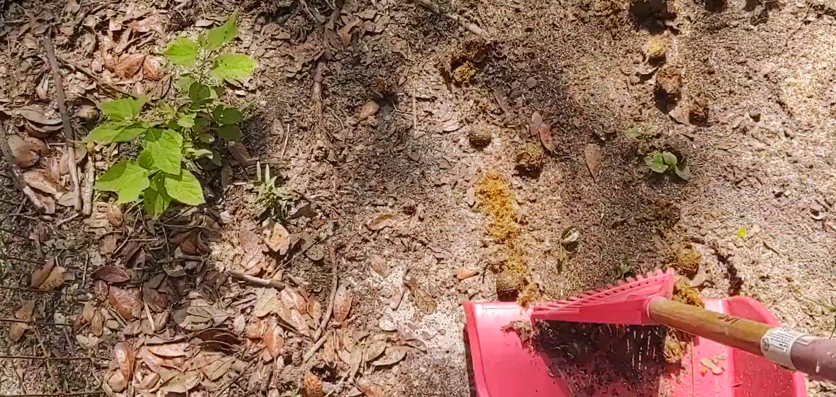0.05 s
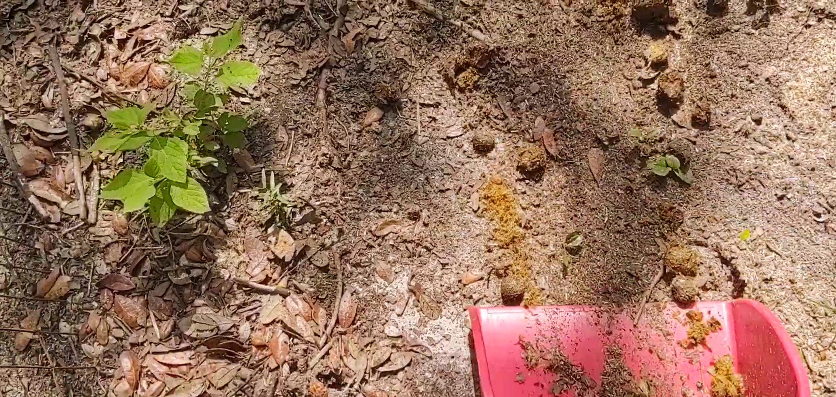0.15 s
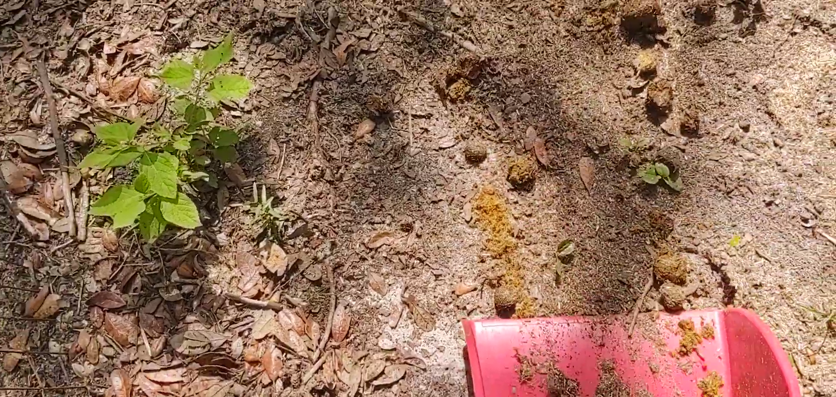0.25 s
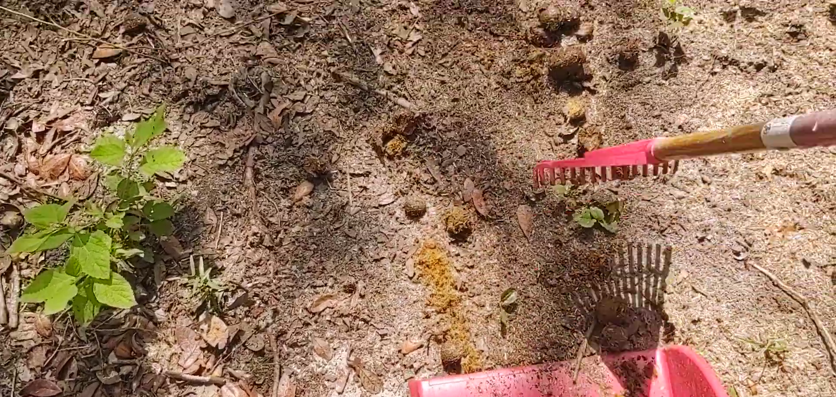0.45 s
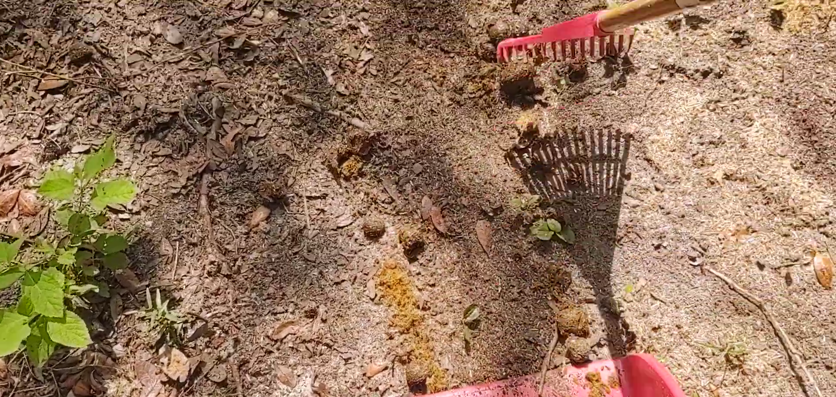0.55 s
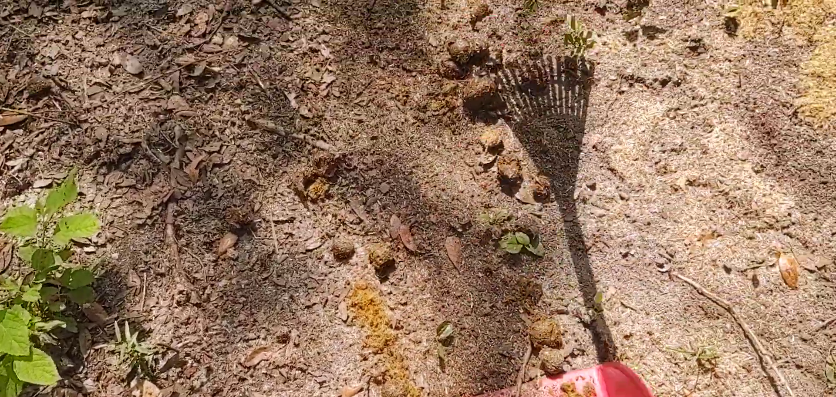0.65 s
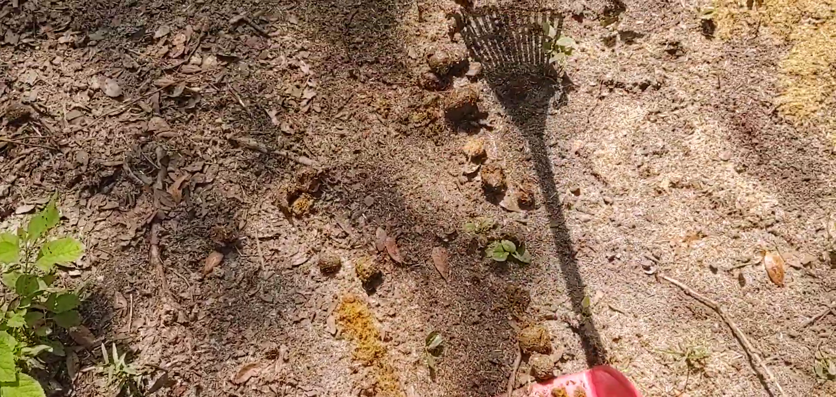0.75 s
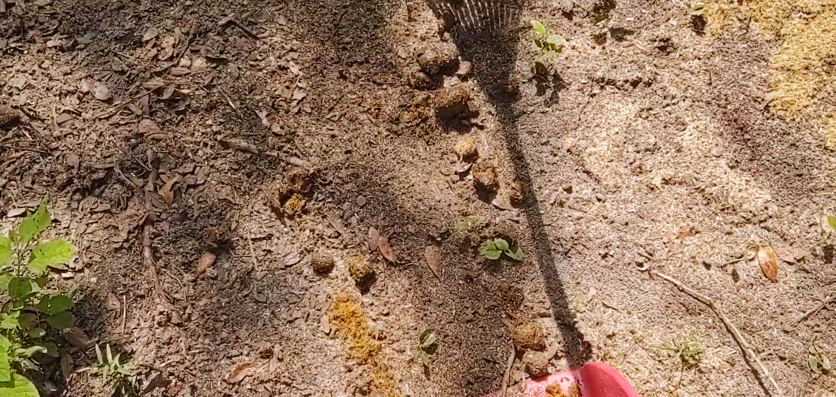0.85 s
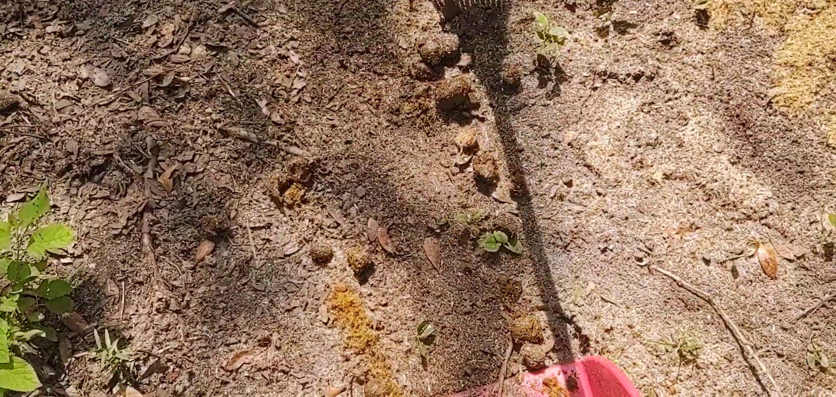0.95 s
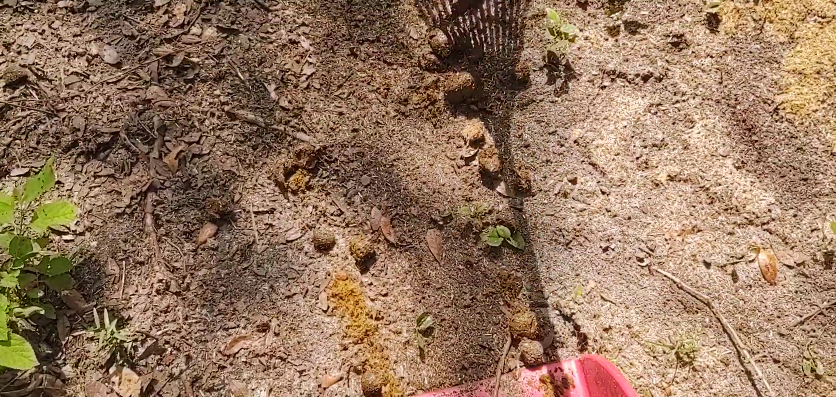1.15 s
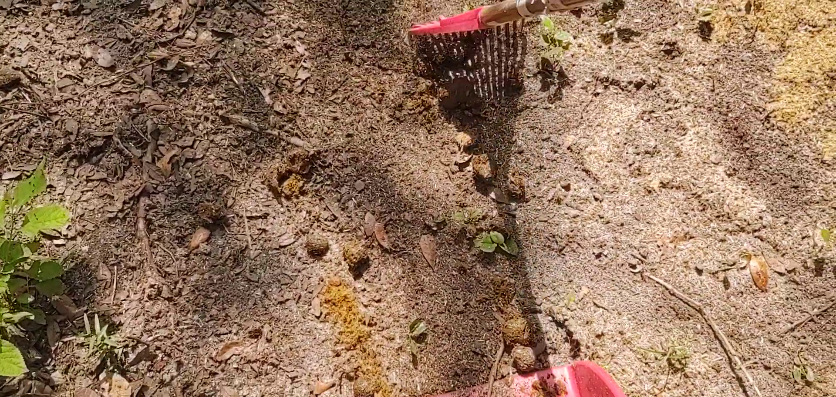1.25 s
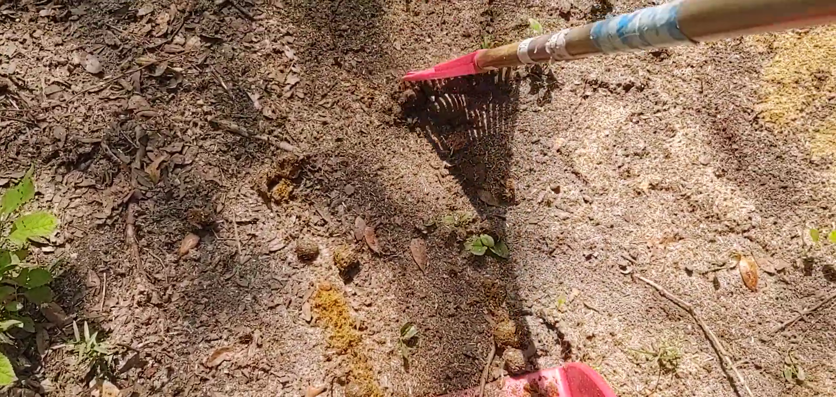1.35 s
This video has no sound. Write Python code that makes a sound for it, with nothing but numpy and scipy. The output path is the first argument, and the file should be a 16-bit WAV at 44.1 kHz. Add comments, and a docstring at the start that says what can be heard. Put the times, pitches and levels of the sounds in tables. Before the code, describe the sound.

A small rake knocks on a plastic scoop, then lightly scrapes dry soil.

```python
"""Loose dirt trickles in a plastic scoop and grit ticks, close by in still outdoor air.
At 0.2 s a small plastic rake knocks twice on the scoop and chatters along it; the impacts excite
the shell's modes, which boom briefly as they decay. The trickle thins, and from 0.9 s the tines comb
lightly through dry soil, ringing as they catch on crumbs while the rake head bumps the ground.
Throughout, the left microphone hears less treble."""
import sys
import numpy as np
from scipy import signal
from scipy.fft import rfft, irfft
from scipy.io import wavfile

SR = 44100
rng = np.random.default_rng(int(sys.argv[2]) if len(sys.argv) > 2 else 0)


def generate_wav(sig):
    """Save sig (samples, or channels by samples) to the path in sys.argv[1] as 16-bit PCM at SR."""
    pcm = np.round(np.clip(np.atleast_2d(sig).T, -1, 1) * 32767).astype(np.int16)
    wavfile.write(sys.argv[1], SR, pcm)


N = 61739
T = np.arange(N) / SR


def undb(db):
    """Amplitude ratio of a level in decibels."""
    return 10 ** (np.asarray(db) / 20)


def unit(x):
    """Normalisation to rms 1."""
    return x / np.sqrt(np.mean(x ** 2))


def pan(x, db):
    """Direction by level difference: left minus right in dB."""
    return x * undb(np.array([[db], [-db]]) / 2)


def curve(points):
    """Amplitude envelope through (t/s, level/dB) points."""
    return undb(np.interp(T, *np.array(points).T))


def colour(x, points):
    """Spectral shaping through (f/Hz, level/dB) points."""
    hz, db = np.array(points).T
    f = np.maximum(np.fft.rfftfreq(2 * N, 1 / SR), 1)
    gain = undb(np.interp(np.log(f), np.log(hz), db))
    return irfft(rfft(x, 2 * N) * gain)[..., :N]


def lowpass(x, hz):
    """Second-order low-pass."""
    return signal.sosfilt(signal.butter(2, hz, fs=SR, output="sos"), x)


def radiate(x, hz):
    """Radiation efficiency: a small body emits little below its first mode."""
    return signal.sosfilt(signal.butter(6, hz, "high", fs=SR, output="sos"), x)


def through(x, response):
    """Convolution with an impulse response."""
    return irfft(rfft(x, 2 * N) * rfft(response, 2 * N))[..., :N]


def fade(t, t60):
    """Exponential decay, 60 dB in t60 seconds."""
    return np.exp(-np.log(1000) * t / t60)


def ring(modes):
    """Modal superposition: impulse response of (f/Hz, level/dB, T60/s) modes."""
    return sum(undb(db) * np.cos(2 * np.pi * hz * T) * fade(T, t60) for hz, db, t60 in modes)


def burst(start, rise, t60):
    """Transient envelope: quadratic rise, exponential decay; times in seconds."""
    age = T - start
    return np.clip(age / rise, 0, 1) ** 2 * fade(np.maximum(age - rise, 0), t60)


def press(start, contact_ms):
    """Contact pulse of unit area: the longer the contact, the duller the sound."""
    force = np.sin(np.pi * np.clip((T - start) * 1000 / contact_ms, 0, 1)) ** 2
    return force / force.sum()


def noise(shared):
    """Partial coherence: stereo noise with a fraction of its power common to both sides."""
    return np.sqrt(shared) * rng.standard_normal(N) + np.sqrt(1 - shared) * rng.standard_normal((2, N))


def grains(per_s, spread_db, shared):
    """Shot noise: tiny clicks of random size at random moments."""
    size = undb(spread_db * np.minimum(rng.exponential(size=N), 4))
    return unit((rng.random(N) < per_s / SR) * size * noise(shared))


# Spectrum of outdoor air: f/Hz, level/dB
AIR_SPECTRUM = [(25, 24), (70, 10.5), (120, 5), (200, 4.5), (310, -5.5), (450, 3), (700, -13), (1500, -15),
                (4000, -16), (9000, -10.5), (16000, -20)]
def air():
    """Ambient noise: steady, quiet and strongest in the bass."""
    return pan(undb(-57.5) * unit(colour(noise(0.17), AIR_SPECTRUM)), db=2)


def reverberation(direct):
    """Diffuse reflection: the surroundings return a faint, dull tail."""
    response = lowpass(noise(0.1), hz=2500) * burst(0, rise=0.0067, t60=0.48)
    return undb(-29) * through(direct, unit(response) / np.sqrt(N))


# Normal modes of the scoop: f/Hz, level/dB, T60/s
SCOOP_MODES = [(191.4, -1.5, 0.082), (214.3, -12, 0.23), (244.6, -4, 0.071), (283.8, 5, 0.029),
               (352.3, -6.5, .07), (412.2, -2.5, 0.1), (510, -1, .085), (611, -9, 0.1), (738, -19, 0.09),
               (1118, -8.5, .05), (1840, -6.5, 0.019), (2135, 0, 0.0335), (2732, -1, .024),
               (3100, -4.5, 0.022)]
SCOOP_LOW_HZ = 174.7  # below this the open shell barely moves the air
def scoop(force):
    """Forced vibration: the plastic shell answers a force with its normal modes."""
    return through(force, ring(SCOOP_MODES))


# Envelope of the sliding dirt: t/s, level/dB
TRICKLE_LEVELS = [(0, -53.5), (.05, -57), (.11, -54.5), (.2, -55), (.25, -51.5), (.315, -45), (.36, -61.5),
                  (.42, -61.5), (.6, -64), (.75, -68.5), (.92, -72.5), (1.4, -64.5)]
# Spectrum of its hiss: f/Hz, level/dB
TRICKLE_SPECTRUM = [(200, -20.5), (500, 3.5), (800, -1.5), (1500, -1), (2400, -1.5), (3800, -6), (6500, -2),
                    (9000, 1.5), (13000, 2), (16000, -11.5)]
def trickle():
    """Superposed micro-impacts: dirt hisses over the plastic and faintly drums the scoop."""
    hiss = unit(colour(grains(per_s=5000, spread_db=-1.5, shared=0.15), TRICKLE_SPECTRUM))
    drum = unit(scoop(grains(per_s=4400, spread_db=-2.8, shared=0.95)))
    return pan((hiss + undb(-6) * drum) * curve(TRICKLE_LEVELS), db=4)


# Lone ticks of grit: t/s, level/dB, f/Hz, pan/dB
GRIT_TICKS = [(.0765, -51, 8080, -31), (0.1592, -35.5, 6690, -7.5), (0.1934, -55, 2200, 19),
              (.5385, -47.5, 10900, -1), (.648, -53, 12200, -3), (1.056, -38, 12640, -7.5),
              (1.0567, -43, 8600, -2), (1.065, -56.5, 10600, -11.5), (1.1728, -49, 10100, 16),
              (1.199, -41.5, 13600, -8), (1.2036, -43.5, 6400, 2), (1.2073, -33.5, 12500, 5.5)]
def grit():
    """Band-limited transients: single bits of grit snap, each in its own band."""
    out = np.zeros((2, N))
    for start, db, hz, pan_db in GRIT_TICKS:
        b, a = signal.iirpeak(hz, Q=1 / 0.3, fs=SR)
        snap = unit(signal.lfilter(b, a, signal.lfilter(b, a, noise(1))))
        out += pan(undb(db) * snap * burst(start, rise=0.00067, t60=0.0053), pan_db)
    return out


# Bumps of the rake head on the ground: t/s, level/dB
HEAD_BUMPS = [(1.101, -53.5), (1.154, -55), (1.201, -54), (1.22, -58.5), (1.245, -53.5), (1.3, -54.5)]
def rake_head():
    """Soft impact: long contacts excite two low modes in dull bumps."""
    force = sum(undb(db) * press(start, contact_ms=2.63) for start, db in HEAD_BUMPS)
    thud = through(force, ring([(115.7, 2, 0.056), (154.2, -5, 0.2)]))
    return pan(radiate(thud, hz=118), db=-16.5)


# Drag of the rake on the soil: t/s, level/dB, relative tine level/dB
SOIL_DRAG = [(0.892, -96.5, -8), (.93, -67.5, -12), (1.0, -80.5, 1), (1.062, -68.5, 0.5), (1.089, -66, 2),
             (1.135, -63, -2.5), (1.18, -63, -9), (1.229, -61, -8), (1.32, -58.5, -8), (1.4, -59.5, -12)]
# Catches on crumbs: t/s, tine level/dB, crunch level/dB
CRUMB_CATCHES = [(0.922, -64, -64.5), (.961, -57, -55), (1.02, -59.5, -74), (1.088, -53.5, -64),
                 (1.15, -72, -61), (1.198, -51.5, -48), (1.2935, -52, -42.5), (1.298, -63, -57),
                 (1.365, -56, -53.5)]
# Normal modes of the tines: f/Hz, level/dB, T60/s
TINE_MODES = [(1098, -27, 0.049), (1202, 1.5, 0.12), (1288.5, 10, 0.076), (1415, -8.5, 0.047),
              (2114, -10.5, .025), (3100, -11.5, 0.013)]
# Spectrum of crunching soil: f/Hz, level/dB
SOIL_SPECTRUM = [(120, -16), (350, 1), (700, -0.5), (1400, 0), (1800, -2), (2300, 1), (3100, -0.5),
                 (4500, -3.5), (6300, -7), (10000, -5.5), (13500, -5.5), (16000, -11.5)]
def raking():
    """Frictional excitation: soil crunches and rings the tines, louder as they catch on crumbs."""
    times, drag_db, tine_db = np.array(SOIL_DRAG).T
    drag = undb(np.interp(T, times, drag_db))
    tine_level = drag * undb(np.interp(T, times, tine_db))
    crunch_level = drag * undb(1.5)
    for start, ring_db, crunch_db in CRUMB_CATCHES:
        catch = burst(start, rise=0.0037, t60=0.04)
        tine_level += undb(ring_db) * catch
        crunch_level += undb(crunch_db) * catch
    tines = unit(through(noise(0.7), ring(TINE_MODES)))
    crunch = unit(colour(grains(per_s=9000, spread_db=0.5, shared=0.2082), SOIL_SPECTRUM))
    return pan(tine_level * tines + crunch_level * crunch, db=3)


def judder():
    """Stick-slip friction: between blows the sliding rake keeps the scoop's low modes rattling."""
    start_s, end_s, ramp_s = 0.216, 0.3, 0.0073
    contact = np.clip(np.minimum(T - start_s, end_s - T) / ramp_s, 0, 1)
    slips = grains(per_s=790, spread_db=1, shared=1)
    gain = undb(-37) / np.std(scoop(slips))
    rattle = lowpass(scoop(gain * contact * slips), hz=880)
    return radiate(rattle, SCOOP_LOW_HZ)


# Blows of the rake on the scoop: t/s, force level/dB, contact time/ms,
# then for the clack: level/dB, cutoff f/Hz, pan/dB, T60/s
RAKE_BLOWS = [(0.2141, -37.5, 0.073, -11.5, 8780, -2, 0.01), (0.2263, -39, 0.26, -20, 14000, 0.5, 0.019),
              (0.2286, -33.5, 0.24, -18.5, 2815, 17.5, 0.013), (0.23, -29, 2.1, -55, 3000, -10.5, .02),
              (0.2358, -32, .6, -32, 5000, 2, .02), (0.2432, -37, 2.8, -44, 3000, -4.5, 0.018),
              (0.2621, -36, 0.6, -32, 1500, -14.5, .028), (0.2809, -25, 3.5, -63, 3000, -1, .03),
              (0.289, -29.5, 2.7, -26.5, 2500, 10.5, 0.047), (0.2967, -41, 2., -35, 3000, -1, 0.016),
              (0.3022, -17.5, 2.94, -59, 2957, -2, 0.016), (0.3129, -27, 3.08, -47, 3060, -7.5, 0.073),
              (.352, -51.5, 0.89, -57, 3187, -7.5, 0.032)]
# Spectrum of the plastic's dense upper modes: f/Hz, level/dB
CLACK_SPECTRUM = [(120, -40.5), (300, -13.5), (800, -2.5), (1200, -5), (1580, -13), (2000, 4.5), (2380, -1),
                  (2750, 4.5), (3130, 4), (3400, -9.5), (4600, 0), (5350, -10.5), (6600, -5), (9800, -12.5),
                  (11500, -6.5), (16000, -9)]
def blows():
    """Impact excitation: each blow drives the scoop's modes and a clack; soft contacts mostly boom."""
    rise_s = 0.00075
    force, clacks = np.zeros(N), np.zeros((2, N))
    for start, force_db, contact_ms, clack_db, cutoff_hz, pan_db, t60 in RAKE_BLOWS:
        force += undb(force_db) * press(start, max(contact_ms, 0.1))
        envelope = burst(start, rise_s, t60) + undb(-15) * burst(start, rise_s, t60=0.083)
        clack = lowpass(unit(colour(noise(0.14), CLACK_SPECTRUM)), cutoff_hz)
        clacks += pan(undb(clack_db) * envelope * clack, pan_db)
    return radiate(pan(scoop(force), db=2) + clacks, SCOOP_LOW_HZ)


def scene():
    """Superposition of direct sound, its reverberation and the outdoor air."""
    direct = blows() + judder() + trickle() + grit() + raking() + rake_head()
    return direct + reverberation(direct) + air()


# Response of the shaded left microphone: f/Hz, level/dB
LEFT_RESPONSE = [(20, -1.5), (2500, -6.5), (4000, -6.5), (6300, -2.5), (8000, -9.5), (10500, -20.5),
                 (16000, -14.5)]
def record(dry):
    """Acoustic shadow and band limiting: the left loses treble; both sides lose bass and the very top."""
    shaded = np.array([colour(dry[0], LEFT_RESPONSE), dry[1]])
    low_cut_hz, high_cut_hz = 85, 15900
    thinned = signal.sosfilt(signal.butter(2, low_cut_hz, "high", fs=SR, output="sos"), shaded)
    return signal.sosfilt(signal.ellip(10, 0.1, 70, high_cut_hz, fs=SR, output="sos"), thinned)


dry = scene()
out = record(dry)
generate_wav(out)
```